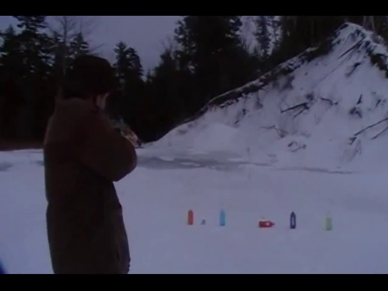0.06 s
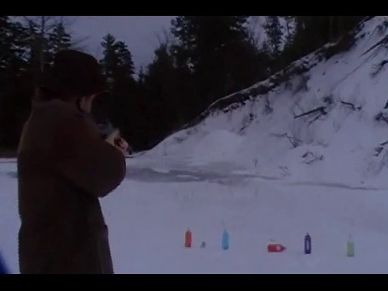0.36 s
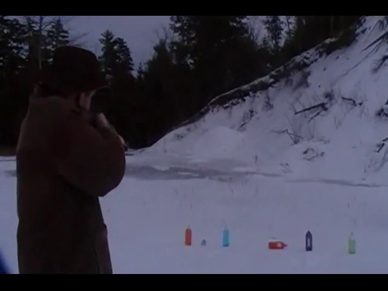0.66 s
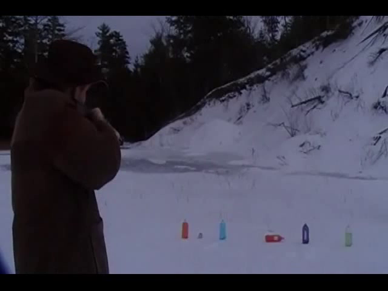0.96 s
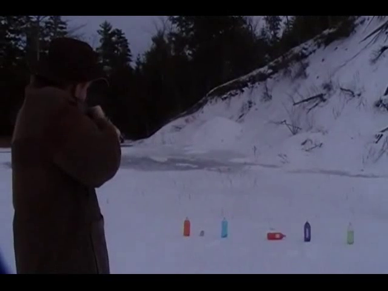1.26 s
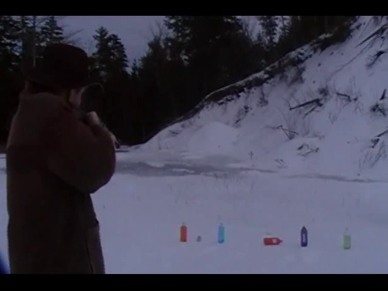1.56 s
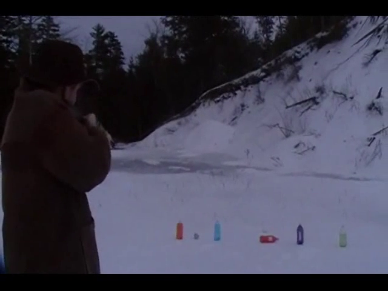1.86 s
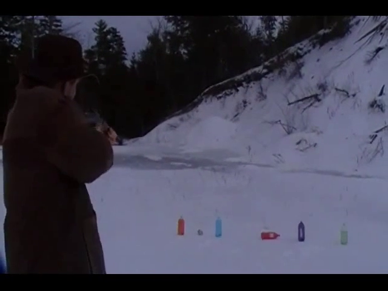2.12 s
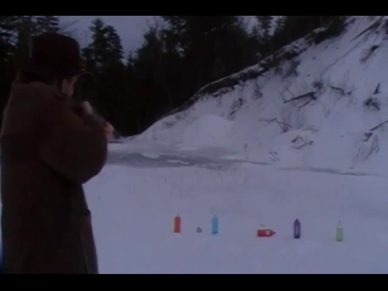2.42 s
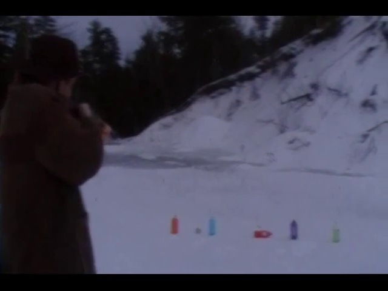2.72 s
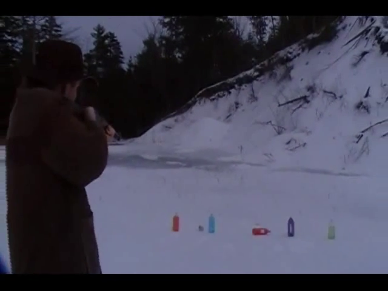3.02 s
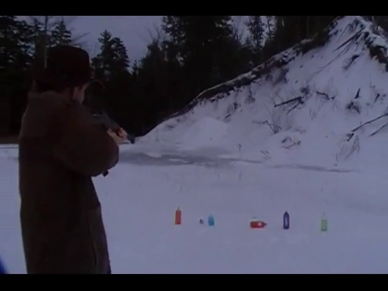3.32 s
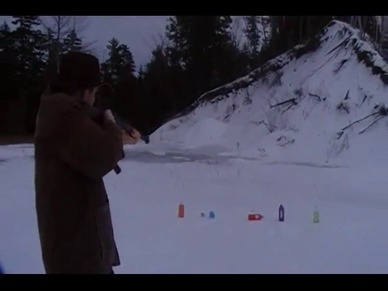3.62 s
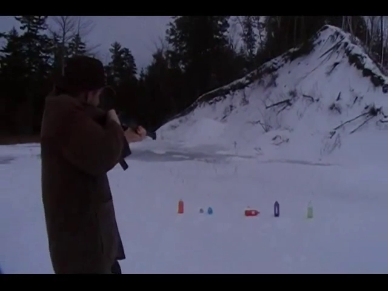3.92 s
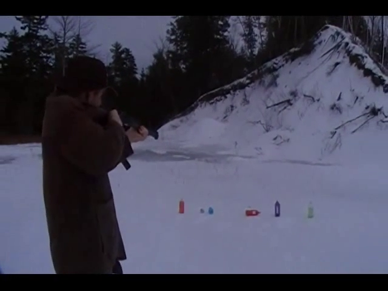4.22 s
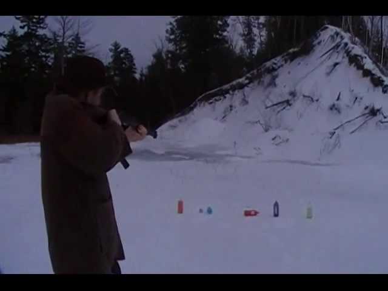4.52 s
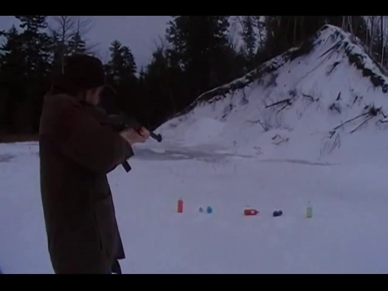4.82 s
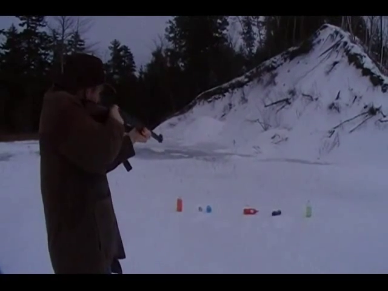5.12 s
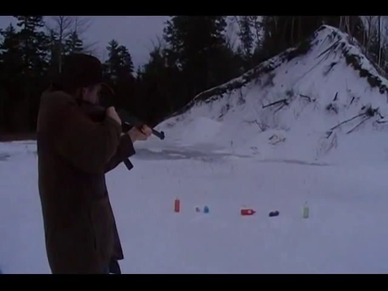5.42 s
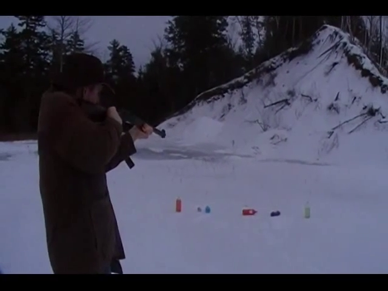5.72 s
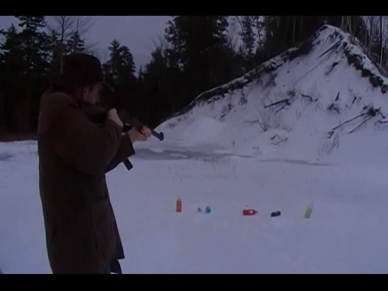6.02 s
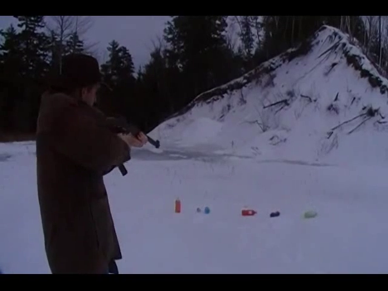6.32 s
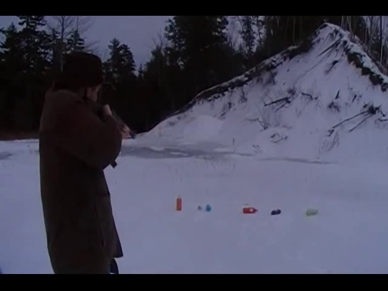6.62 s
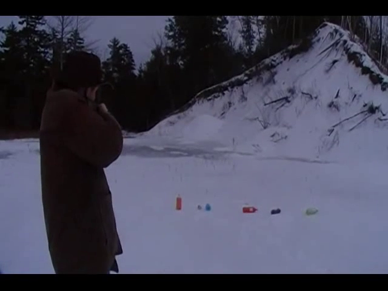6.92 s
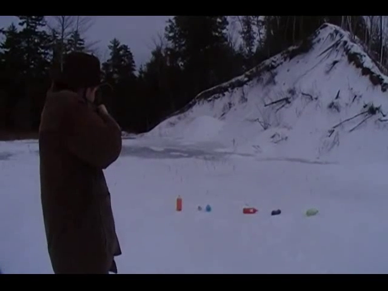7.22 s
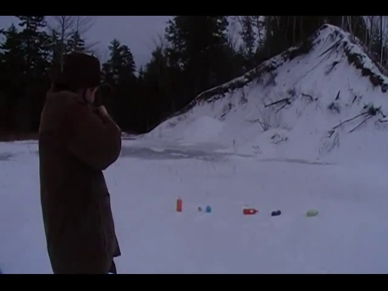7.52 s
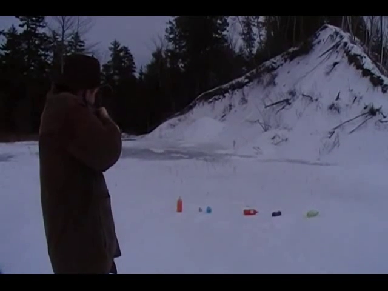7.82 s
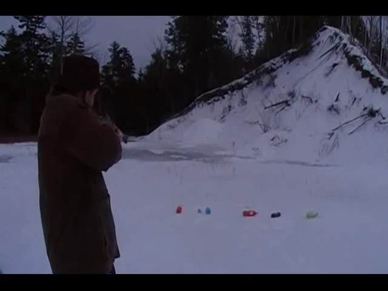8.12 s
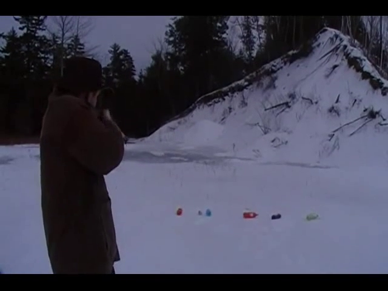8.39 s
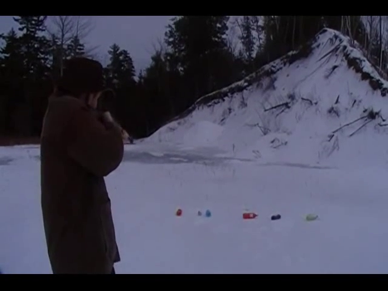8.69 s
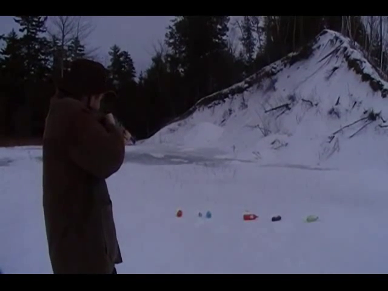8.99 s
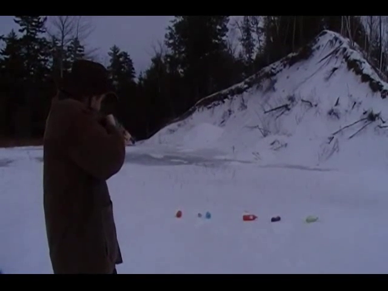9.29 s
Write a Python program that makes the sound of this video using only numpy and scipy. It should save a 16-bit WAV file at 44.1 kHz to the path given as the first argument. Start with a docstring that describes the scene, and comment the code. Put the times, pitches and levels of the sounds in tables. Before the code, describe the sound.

Five rifle shots crack across an open field, each with a bullet smack, a fading echo and the metallic clack of a lever reloading.

```python
"""A rifle's lever snaps open, slides and locks over the dying wash of a shot, on a snowy field.
The small rifle then fires five times at bottles, a few metres from a camera. Each crack is followed by
the bullet's strike and a long wash scattered by the forest edge; then the steel action cycles again.
Between shots the rifle ticks in the hands, a coat rustles and the camera's focus motor chirps.
Underneath lie a far murmur, a low drone, hiss and a few soft booms."""
import sys
import numpy as np
from scipy import signal
from scipy.fft import rfft, irfft, next_fast_len
from scipy.io import wavfile

SR = 44100
rng = np.random.default_rng(int(sys.argv[2]) if len(sys.argv) > 2 else 0)


def generate_wav(sig):
    """Save sig (samples, or channels by samples) to the path in sys.argv[1] as 16-bit PCM at SR."""
    pcm = np.round(np.clip(np.atleast_2d(sig).T, -1, 1) * 32767).astype(np.int16)
    wavfile.write(sys.argv[1], SR, pcm)


N = 421146
TIME_S = np.arange(N) / SR
EVENT_S = np.arange(SR // 6) / SR

# background levels (time [s], level [dB]); the drone's is before DRONE_GAIN_DB
MURMUR_LEVEL = [(0, -50.5), (1.1, -60.5), (1.6, -50), (2.55, -58), (4.3, -61), (5.4, -50), (5.7, -60),
                (7.1, -58), (7.55, -54), (9.55, -54.5)]
DRONE_LEVEL = [(0.0, -61), (0.95, -63), (3.0, -60), (4.57, -62), (5.93, -60.5), (7.69, -63), (7.95, -64),
               (9.55, -61.5)]
HISS_LEVEL = [(0, -45.5), (1.3, -52), (3.9, -49.5), (4.2, -51), (7.7, -55), (9.0, -51), (9.55, -54)]
# shot fired before the start, heard only as echo (time [s], wash [dB], rumble [dB])
EARLIER_SHOT = (-0.48, -31, -55)
# echo envelopes (full after [s], held until [s], rise [dB/s], fall [dB/s])
WASH_ENVELOPE = (0.16, 0.33, 390, 56)
RUMBLE_ENVELOPE = (.3, .48, 38, 62)
# lever opens (bolt back [s], latch lead [s], rebound lag [s], stop lag [s], steel [dB], stop [dB],
# stock re stop [dB])
OPENINGS = [(0.0875, 0.054, 0.016, 0.025, -19, -32, -19), (2.1559, 0.054, .0138, 0.027, -19, -21.5, -2.5),
            (3.4141, 0.058, .0128, 0.032, -17.5, -24.5, -9.5), (4.995, 0.06, .0122, 0.026, -17, -18, -5),
            (6.4533, .0568, .013, .0328, -15.5, -24.5, -6), (8.2692, 0.048, .03, .0275, -21, -25, 2.5)]
# open lever knocks (time [s], level [dB])
LEVER_KNOCKS = [(0.304, -44), (0.3855, -28), (3.552, -30.5), (8.43, -32.5)]
# carrier lifts a cartridge, one per closing (time [s], level [dB])
CARRIER_LIFTS = [(0.573, -23), (2.322, -26), (3.589, -24.5), (5.1441, -23), (6.591, -22), (8.497, -31.5)]
# lever closes (lock [s], feed lead [s], slide base level [dB], lock [dB], ring offset [dB])
CLOSINGS = [(0.7048, 0.042, -35.5, -14, -4), (2.456, 0.067, -34, -13.5, -2.5),
            (3.741, 0.081, -36, -14, -1.5), (5.287, 0.059, -33, -13.5, 1), (6.7033, .0465, -32, -14.5, 1),
            (8.57, 0.023, -33, -13, -0.5)]
# handled rifle ticks (time [s], level [dB], centre [Hz], wood knock re peak [dB])
RIFLE_TICKS = [(0.739, -29, 2860, -4.5), (0.979, -38, 2870, -1.5), (1.068, -40.5, 3960, -12),
               (1.118, -41.5, 2500, -3), (2.5353, -37, 4230, -8), (2.8112, -26.5, 3020, -0.5),
               (4.0352, -20, 3700, -6.5), (4.0842, -40, 2300, -30), (4.101, -41, 2270, -33),
               (4.2833, -32, 5100, -1), (5.572, -31, 6300, 1.5), (5.797, -48.5, 2480, -14),
               (7.2063, -44, 5130, -14), (7.288, -41.5, 4860, -10), (7.366, -44, 900, -12),
               (8.846, -24.5, 2700, -5), (9.1199, -35.5, 3300, 3), (9.3073, -32, 3360, -7),
               (9.457, -38, 4440, -14)]
# sharp clicks (time [s], steel [dB], body [dB], body centre [Hz], wood knock re peak [dB])
STEEL_CLICKS = [(7.066, -28, -21, 5100, -15.5), (9.4663, -12.5, -22.5, 1850, -8)]
# dull bumps (time [s], level [dB])
BUMPS = [(2.756, -35.5), (2.808, -40), (2.841, -36.5), (2.952, -38)]
# sleeve on coat (start [s], peak [s], end [s], level [dB])
SLEEVE_BRUSHES = [(1.484, 1.707, 1.736, -34.5), (2.46, 2.47, 2.524, -34.5), (2.736, 2.766, 3.04, -43),
                  (6.74, 6.776, 7.05, -47)]
# focus motor runs (start [s], end [s], base level [dB], pitch [Hz])
FOCUS_RUNS = [(0.747, 1.43, -46.5, 2136), (4.098, 4.59, -46.5, 2156), (5.346, 5.7, -56, 2860)]
# shots (time [s], crack [dB], wash [dB], rumble [dB], background dip [dB])
SHOTS = [(1.7599, -9.5, -30.5, -55, 17), (3.0276, -11, -29.5, -44, 4), (4.6151, -10.5, -30, -46.5, -1),
         (6.0156, -10, -29.5, -43, -1), (7.8365, -10, -29.5, -44.5, 1)]
# bullet strikes (time [s], crack [dB], smack [dB], thud [dB])
STRIKES = [(1.8148, -15, -29, -38.5), (3.0795, -21.5, -20.5, -21), (4.667, -29.5, -26, -22),
           (6.0656, -19, -16.5, -22.5), (7.888, -19, -23, -20)]
# soft booms (start [s], length [s], level [dB], centre [Hz])
BOOMS = [(3.54, .09, -45, 150), (4.98, 0.072, -35.5, 180), (5.05, 0.067, -34, 300),
         (6.181, 0.052, -34.5, 190), (6.31, .06, -30, 236), (7.89, 0.19, -44, 135), (8.739, 0.12, -50, 48)]
# receiver resonances (frequency [Hz], width [Hz], level [dB])
RECEIVER_MODES = [(849, 53, 5), (1370, 400, 3), (1655, 55, 7), (1830, 140, -7)]
# first target's resonances (frequency [Hz], level [dB], t60 [s])
TARGET_MODES = [(1147, -50, .25), (2169, -44, .29), (4334, -42, .09), (5033, -43, .08), (6842, -40, .08)]

# source spectra (frequency [Hz], relative density [dB])
MURMUR_SPECTRUM = [(100, -11), (220, -3), (330, -2), (500, -2.5), (800, -18.5), (2000, -46)]
DRONE_SPECTRUM = [(20, -3.5), (45, 2), (70, 6.5), (110, 0), (200, -13.5), (600, -23.5)]
HISS_SPECTRUM = [(300, -8), (700, 4.5), (1500, 4), (3000, 1.5), (4500, 1), (7000, -3.5), (7650, -6),
                 (7880, 7), (8150, -5), (10500, -8), (12500, -15)]
WASH_SPECTRUM = [(300, -12), (520, -9.5), (900, -1), (1600, 2.5), (2500, -2.5), (4500, -1), (6000, -2.5),
                 (8000, -5), (10500, -11.5), (12500, -16)]
RUMBLE_SPECTRUM = [(35, -39), (100, 3), (190, -2.5), (330, 1.5), (550, -4), (1000, -44)]
SCRAPE_SPECTRUM = [(1200, -15.5), (2300, -4), (2750, -4), (3100, -2.5), (4200, 1.5), (5000, 4.5), (6200, 2),
                   (7400, -6), (10000, -5.5), (12500, -11)]
STOCK_SPECTRUM = [(40, -22), (150, -9.5), (300, 4.5), (450, -4.5), (620, -5), (1500, -17)]
STEEL_SPECTRUM = [(1500, -37.5), (2700, -17.5), (3400, -9), (4100, -3), (5000, 1), (6200, -1.5), (7400, -7),
                  (9000, -3), (10200, -3), (12500, -17)]
BOLT_SPECTRUM = [(120, -58), (320, -0.5), (640, -19.5), (1500, -4), (2770, -8.5), (4800, -1.5), (7100, -13),
                 (10200, -14.5), (12500, -31)]
BUMP_SPECTRUM = [(25, -8), (70, 2), (130, -11), (300, -5), (600, -27), (2000, -40)]
CLOTH_SPECTRUM = [(150, -26), (300, -11), (1000, -3), (1500, -1.5), (6300, -3), (12500, -15.5)]
BLAST_SPECTRUM = [(50, -29), (260, -7.5), (700, -13.5), (1150, -11), (1420, -4), (1900, -9.5), (2750, -12),
                  (4200, -5.5), (5400, -2.5), (7500, -7), (10000, -8.5), (12500, -20.5)]
SMACK_SPECTRUM = [(400, -15.5), (700, -13.5), (950, 4), (1400, 1.5), (2000, -6.5), (2900, -8), (6000, -17)]
THUD_SPECTRUM = [(30, -40), (110, -10.5), (240, -1), (380, -8), (650, -20), (1500, -23.5)]
# stereo width (frequency [Hz], side re mid [dB])
STEREO_WIDTH = [(30, -14), (120, -14), (1000, -18), (2100, -13.5), (4000, -14), (8000, -12), (12000, -9.5)]

DRONE_GAIN_DB, BAND_LIMIT_HZ = 4.5, 12550


def amp(db):
    """Decibels to gain."""
    return np.exp(np.asarray(db) * np.log(10) / 20)


def unit(x):
    """Scale to rms 1."""
    return x / np.sqrt(np.mean(x ** 2) + 1e-20)


def response(spectrum):
    """Gain against frequency, interpolated on a log axis."""
    knots_hz, db = np.transpose(spectrum)
    return lambda hz: amp(np.interp(np.log(hz + 1), np.log(knots_hz), db))


def level(curve):
    """Gain per sample from a dB curve."""
    time_s, db = np.transpose(curve)
    return amp(np.interp(TIME_S, time_s, db))


def stereo_noise(size, wider_db=0, colour=np.ones_like):
    """Mid/side noise, white by default; diffuse sound is wider."""
    padded = next_fast_len(size, real=True)
    hz = np.fft.rfftfreq(padded, 1 / SR)
    mid, side = rng.standard_normal((2, 2 * len(hz))).view(complex) * colour(hz)
    side = side * amp(wider_db) * response(STEREO_WIDTH)(hz)
    return irfft(np.array([mid + side, mid - side]), padded)[:, :size]


def noise(spectrum, wider_db=0, size=N):
    """Coloured stereo noise of rms 1."""
    return unit(stereo_noise(size, wider_db, response(spectrum)))


def flutter(depth_db, rate_hz):
    """Random gain, linear in dB between knots."""
    knots = rng.standard_normal(int(N * rate_hz / SR) + 4)
    return amp(depth_db * np.interp(TIME_S * rate_hz, np.arange(len(knots)), knots))


def impulse(spectrum, size=2048):
    """Minimum-phase impulse response of a spectrum."""
    cepstrum = irfft(np.log(response(spectrum)(np.fft.rfftfreq(size, 1 / SR))))
    cepstrum[1:size // 2] *= 2
    cepstrum[size // 2 + 1:] = 0
    return irfft(np.exp(rfft(cepstrum)))


def decay(t60_s, delay_s=0):
    """Delayed exponential decay."""
    age_s = EVENT_S - delay_s
    return (age_s >= 0) * amp(-60 * np.maximum(age_s, 0) / t60_s)


def burst(envelope, body):
    """Enveloped noise rings a body; energy of 10 ms at rms 1."""
    size = len(EVENT_S)
    rung = signal.fftconvolve(stereo_noise(size) * envelope, body[None], axes=1)[:, :size]
    return unit(rung) * np.sqrt(SR / 100 / size)


def add(track, time_s, sound):
    """Mix a sound into the track."""
    part = track[:, max(round(time_s * SR), 0):][:, :sound.shape[-1]]
    part += sound[..., :part.shape[1]]


def air():
    """Swelling far murmur, low drone and the camera's hiss with its thin whine."""
    murmur = level(MURMUR_LEVEL) * noise(MURMUR_SPECTRUM, wider_db=6)
    drone = unit(flutter(depth_db=-3, rate_hz=5) * noise(DRONE_SPECTRUM, wider_db=4.5))
    hiss = level(HISS_LEVEL) * noise(HISS_SPECTRUM, wider_db=10)
    return murmur + amp(DRONE_GAIN_DB) * level(DRONE_LEVEL) * drone + hiss


def echo_gain(shot_s, full_s, held_s, rise_db_per_s, fall_db_per_s):
    """A shot's echo rises, holds and dies away."""
    age_s = TIME_S - shot_s
    rise_db = rise_db_per_s * np.maximum(full_s - age_s, 0)
    fall_db = fall_db_per_s * np.maximum(age_s - held_s, 0)
    return (age_s > 0) * amp(-rise_db - fall_db)


def forest_echo():
    """Trunks scatter each shot as a grainy wash, with lumps from the banks and a rolling rumble."""
    trunks = unit(flutter(depth_db=3, rate_hz=360) * noise(WASH_SPECTRUM, wider_db=2.5))
    banks = unit(flutter(depth_db=4, rate_hz=70) * noise(SMACK_SPECTRUM))
    rumble = unit(flutter(depth_db=7, rate_hz=30) * noise(RUMBLE_SPECTRUM))
    fired = [EARLIER_SHOT] + [(time_s, wash_db, rumble_db) for time_s, _, wash_db, rumble_db, _ in SHOTS]
    wash_gain = sum(amp(db) * echo_gain(time_s, *WASH_ENVELOPE) for time_s, db, _ in fired)
    rumble_gain = sum(amp(db) * echo_gain(time_s, *RUMBLE_ENVELOPE) for time_s, _, db in fired)
    return wash_gain * (trunks + amp(-13) * banks) + rumble_gain * rumble


def receiver(tilt_db_per_oct, pitch_scatter=.012):
    """The receiver's ring, varied per contact; hard contacts tilt it upward."""
    age_s, ring = EVENT_S[:SR // 20], 0
    for hz, width_hz, db in RECEIVER_MODES:
        gain = amp(db + tilt_db_per_oct * np.log2(hz) + rng.normal(0, 2.5)) * width_hz
        pitch_hz = hz * (1 + pitch_scatter * rng.standard_normal())
        ring += gain * np.exp(-np.pi * width_hz * age_s) * np.cos(2 * np.pi * pitch_hz * age_s)
    return ring


def clunk(db, stock_db=-9, ring_offset_db=0):
    """A part of the action rattles against its stop and knocks the wooden stock."""
    envelope = decay(.067) * (1 - decay(.0081))
    rattle = burst(envelope, impulse(SCRAPE_SPECTRUM))
    ring = amp(ring_offset_db - 2) * burst(envelope, receiver(tilt_db_per_oct=-7.5))
    stock = amp(stock_db) * burst(envelope, impulse(STOCK_SPECTRUM))
    return amp(db) * (rattle + ring + stock)


def snap(db, ring_offset_db=0):
    """Steel hits steel; the ground returns it 5 ms later."""
    envelope = decay(.011) + amp(-8) * decay(.013, delay_s=.005) + amp(-17) * decay(.04)
    steel = burst(envelope, impulse(STEEL_SPECTRUM))
    ring = amp(ring_offset_db - 10) * burst(envelope, receiver(tilt_db_per_oct=9.5))
    return amp(db) * (steel + ring)


def lever_opening():
    """The latch gives, the bolt draws back and rebounds, the lever meets its stop and knocks loosely."""
    out = np.zeros((2, N))
    for back_s, latch_lead_s, rebound_lag_s, stop_lag_s, steel_db, stop_db, stock_db in OPENINGS:
        latch_s = back_s - latch_lead_s
        add(out, latch_s - .028, clunk(db=-32.5))  # hand takes up the slack
        add(out, latch_s, snap(steel_db))
        add(out, back_s - .0061, clunk(db=-25, ring_offset_db=-9))  # bolt drags
        add(out, back_s, snap(steel_db))
        add(out, back_s + rebound_lag_s, snap(steel_db + 1.1))
        add(out, back_s + stop_lag_s, clunk(stop_db, stock_db))
    for time_s, db in LEVER_KNOCKS:
        add(out, time_s, clunk(db, stock_db=-2.5))
    return out


def lever_closing(seat_lead_s=.0165, seat_db=-28.5):
    """The carrier lifts a cartridge, which knocks into the chamber; the bolt seats and locks."""
    out = np.zeros((2, N))
    for (lift_s, lift_db), closing in zip(CARRIER_LIFTS, CLOSINGS):
        lock_s, feed_lead_s, slide_db, lock_db, ring_db = closing
        add(out, lift_s, clunk(lift_db, ring_offset_db=ring_db - 1))
        add(out, lock_s - feed_lead_s, clunk(slide_db + 9, stock_db=-18, ring_offset_db=ring_db))
        add(out, lock_s - seat_lead_s, snap(seat_db, ring_db))
        add(out, lock_s, snap(lock_db, ring_db))
    return out


def bolt_slide(lag_s=.03, edge_s=.0011):
    """Moving forward, the bolt catches and slips on its rails and keeps the receiver ringing."""
    stroke = np.zeros(N)
    for (lift_s, _), (lock_s, _, db, *_) in zip(CARRIER_LIFTS, CLOSINGS):
        inside_s = np.minimum(TIME_S - lift_s - lag_s, lock_s - TIME_S)
        stroke += amp(db) * np.clip(inside_s / edge_s, 0, 1)
    catches = flutter(depth_db=5, rate_hz=190)
    friction = catches * stereo_noise(N)
    ring = unit(signal.fftconvolve(friction, receiver(tilt_db_per_oct=-6)[None], axes=1)[:, :N])
    scrape = unit(catches * noise(BOLT_SPECTRUM))
    return stroke * (amp(3.7) * scrape + amp(-5) * ring)


def tick(hz, knock_db):
    """Light contact with a faint ground echo: a resonance over a small wooden knock."""
    envelope = decay(.0055) + amp(-21) * decay(.012, delay_s=.005) + amp(-31) * decay(.06)
    knock = [(60, knock_db - 27), (180, knock_db - 16), (350, knock_db)]
    valley = [(max(hz / 3, 400), knock_db / 2 - 7.5)]
    resonance = [(hz * .54, -8), (hz * 1.06, 0), (hz * 1.62, -11), (hz * 2.54, -28)]
    return burst(envelope, impulse(knock + valley + resonance))


def handling(aim_start_s=.97, aim_end_s=1.7, aim_ticks=12):
    """The held rifle clicks, ticks (faintly while aiming) and bumps; a sleeve brushes the coat."""
    out = np.zeros((2, N))
    for time_s, steel_db, body_db, hz, knock_db in STEEL_CLICKS:
        add(out, time_s, snap(steel_db, ring_offset_db=-6) + amp(body_db) * tick(hz, knock_db))
    for time_s, db, hz, knock_db in RIFLE_TICKS:
        add(out, time_s, amp(db) * tick(hz, knock_db))
    for slot, (jitter, strength) in enumerate(rng.random((aim_ticks, 2))):
        time_s = aim_start_s + (slot + jitter) / aim_ticks * (aim_end_s - aim_start_s)
        add(out, time_s, amp(-50 + 6 * strength) * tick(hz=3400, knock_db=-16))
    for time_s, db in BUMPS:
        add(out, time_s, amp(db) * burst(decay(.055), impulse(BUMP_SPECTRUM)))
    brush = sum(amp(db) * np.interp(TIME_S, knees_s, [0, 1, 0]) for *knees_s, db in SLEEVE_BRUSHES)
    return out + brush * noise(CLOTH_SPECTRUM, wider_db=5.5)


def focus_motor(step_hz=30, chirp_s=.013, overtone_db=-12):
    """Each step of the lens motor gives a short, slightly gliding chirp."""
    out = np.zeros((2, N))
    envelope = np.sin(np.pi * np.minimum(EVENT_S / chirp_s, 1)) ** 2
    for start_s, end_s, db, hz in FOCUS_RUNS:
        for time_s in np.arange(start_s, end_s, 1 / step_hz):
            detune, glide = rng.normal(0, .012), rng.normal(0, .4) * EVENT_S
            phase = 2 * np.pi * hz * EVENT_S * (1 + detune + glide)
            tone = np.sin(phase) + amp(overtone_db) * np.sin(2 * phase)
            add(out, time_s, amp(db + rng.normal(2, 1)) * envelope * tone)
    return out


def shots():
    """The trigger breaks; the muzzle crack arrives direct and twice off the ground; a tick follows."""
    out, blast = np.zeros((2, N)), impulse(BLAST_SPECTRUM)
    ground = amp(-2) * decay(.01, delay_s=.0045) + amp(-2.5) * decay(.006, delay_s=.0083)
    crack = decay(.017) + ground + amp(-24) * decay(.08, delay_s=.008)
    for time_s, db, *_ in SHOTS:
        add(out, time_s - .0105, amp(db - 23.5) * burst(decay(.22), blast))
        add(out, time_s, amp(db) * burst(crack, blast))
        add(out, time_s + .04, amp(db - 28) * burst(decay(.018), blast))
    return out


def background_dips(sink_s=.045, hold_s=.054, recover_s=.14):
    """Gain that dips briefly after each shot; a negative depth lifts it instead."""
    knees_s = np.cumsum([0, sink_s, hold_s, recover_s])
    dip_db = sum(db * np.interp(TIME_S - shot_s, knees_s, [0, 1, 1, 0]) for shot_s, *_, db in SHOTS)
    return amp(-dip_db)


def bullet_strikes():
    """Each bullet cracks into a bottle and thuds into the snow; the first leaves its target ringing."""
    out = np.zeros((2, N))
    crack = decay(.008) + amp(-15) * decay(.04)
    smack = decay(.0052) + amp(-14.5) * decay(.1)
    thud = decay(.024) + amp(-44) * decay(.38)
    for time_s, crack_db, smack_db, thud_db in STRIKES:
        add(out, time_s, amp(crack_db) * burst(crack, impulse(SCRAPE_SPECTRUM)))
        add(out, time_s, amp(smack_db) * burst(smack, impulse(SMACK_SPECTRUM)))
        add(out, time_s, amp(thud_db) * burst(thud, impulse(THUD_SPECTRUM)))
    ring = sum(amp(db) * decay(t60_s) * np.sin(2 * np.pi * hz * EVENT_S) for hz, db, t60_s in TARGET_MODES)
    add(out, STRIKES[0][0], ring)
    return out


def booms(skirt_db=-24):
    """Soft, hollow swells of low band noise."""
    out = np.zeros((2, N))
    for start_s, length_s, db, hz in BOOMS:
        arch = np.sin(np.pi * np.minimum(EVENT_S / length_s, 1))
        band = [(hz / 2, skirt_db), (hz, 0), (hz * 2, skirt_db), (hz * 10, -80)]
        add(out, start_s, amp(db) * arch * noise(band, size=len(EVENT_S)))
    return out


def scene():
    """Rifle and near sounds over the forest's echo and the quiet field."""
    action = lever_opening() + lever_closing() + bolt_slide()
    foreground = shots() + bullet_strikes() + action + handling() + booms() + focus_motor()
    return foreground + background_dips() * (forest_echo() + air())


def record(dry, ceiling=.97):
    """Soft clip of the highest peaks, then a steep low-pass."""
    clipped = dry / (1 + (dry / ceiling) ** 4) ** (1 / 4)
    padded = next_fast_len(N + 8192)
    hz = np.fft.rfftfreq(padded, 1 / SR)
    low_pass = 1 / np.sqrt(1 + (hz / BAND_LIMIT_HZ) ** 190)
    return irfft(rfft(clipped, padded) * low_pass, padded)[..., :N]


dry = scene()
out = record(dry)
generate_wav(out)
```